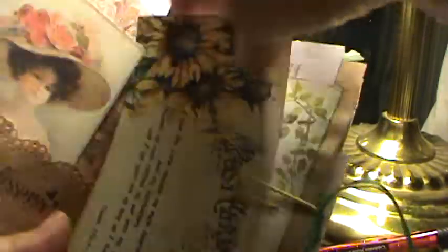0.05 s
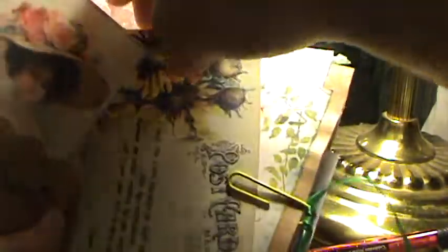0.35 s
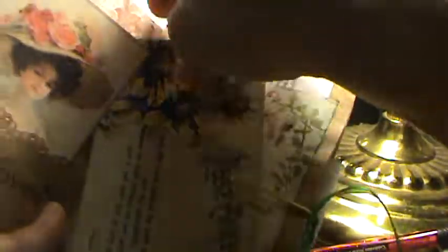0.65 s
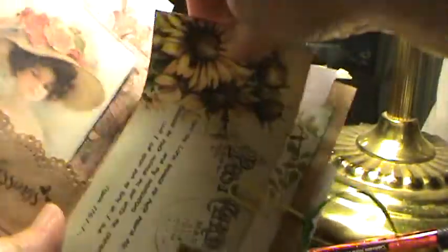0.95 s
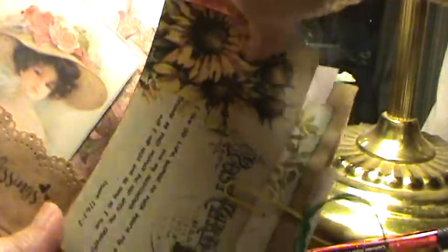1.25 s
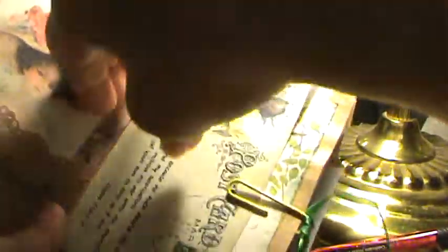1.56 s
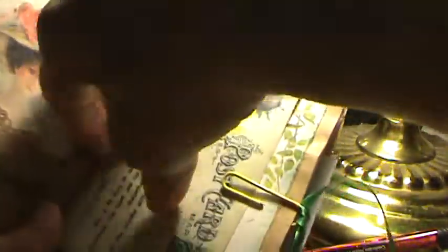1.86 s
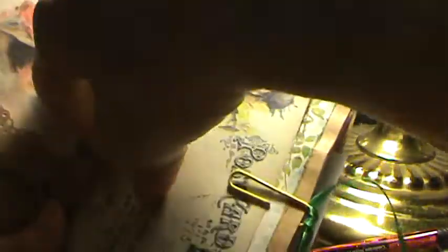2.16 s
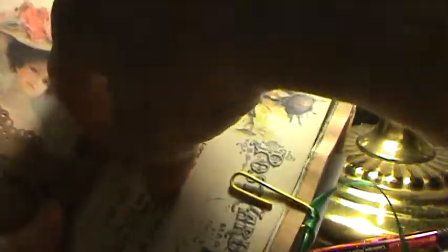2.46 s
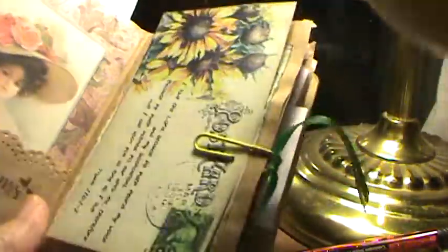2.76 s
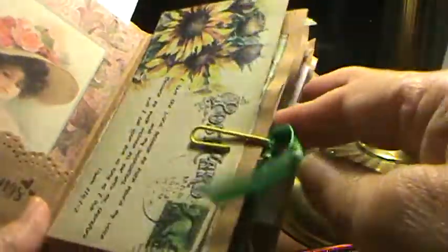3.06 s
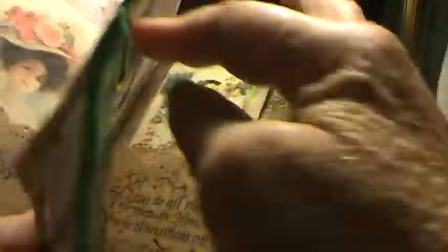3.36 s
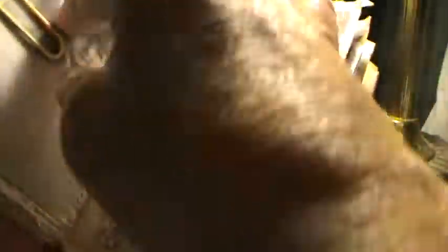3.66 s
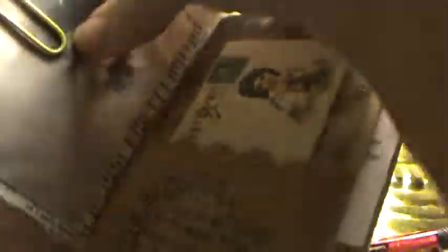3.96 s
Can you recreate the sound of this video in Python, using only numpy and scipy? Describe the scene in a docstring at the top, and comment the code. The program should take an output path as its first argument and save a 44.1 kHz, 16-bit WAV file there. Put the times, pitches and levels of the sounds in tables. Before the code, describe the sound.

Close paper rustling in a small room with a faint electrical hum. A card buckles crisply and scrapes into a journal, followed by soft pats, light finger brushes and the swish of a turning page.

```python
"""A small room with a mains hum, where a hand leafs through a handmade journal close to the microphone.
A stiff card is dragged and buckles, slides into its pocket and is patted flat; fingers brush the edges
and a page turns. Rubbing is a dense train of tiny slips that ring the paper; edges snap, and the book
thuds softly under the fingers. Far behind it all is a very faint, fast ticking."""
import sys
import numpy as np
from scipy import signal
from scipy.fft import rfft, irfft, next_fast_len
from scipy.io import wavfile
from scipy.ndimage import map_coordinates

SR = 44100
rng = np.random.default_rng(int(sys.argv[2]) if len(sys.argv) > 2 else 0)


def digitize_waveform(pressure):
    """Quantize a signal to 16-bit integers and store it at the path in sys.argv[1].

    Rows of a 2-D input are taken as channels; values are limited to [-1, 1].
    """
    field = np.atleast_2d(pressure).T
    bounded = np.clip(field, -1, 1)
    quanta = np.round(bounded * 32767).astype(np.int16)
    wavfile.write(sys.argv[1], SR, quanta)


N = 176400


def card_scrapes():
    """Stiff card scrapes over paper in short pushes that ring it; its free edge sets a broad resonance."""
    # pushes: start_s, rise_s, hold_s, fade_s (to -20 dB), level_db, tilt_db_per_octave, edge_hz
    pushes = [(0, 0.00155, 0.021, 0.1451, -39, 0.5, 2970), (.038, .0158, .0022, 0.0163, -24, 1.1, 6170),
              (.059, 0.0262, 0.043, 0.0631, -31, 0.47, 5940),
              (0.128, 0.0032, 0.01574, 0.0012, -28, 1.05, 11200),
              (0.171, 0.0088, 0.00536, 0.0513, -23, .5, 7770),
              (0.197, 0.0151, 0.0144, 0.0481, -31.5, -0.46, 2090),
              (.353, 0.00268, 0.00795, 0.0091, -36.5, -1.59, 1690),
              (0.526, 0.00504, 0.0237, 0.0734, -39, -1, 2500),
              (0.605, .02, 0.0039, 0.01, -40.5, -2.27, 1400),
              (0.653, 0.0061, 0.0365, 0.09, -46, -1.56, 2490),
              (.704, 0.0262, 0.0032, 0.1223, -32, 1.5, 2710),
              (0.777, 0.0933, 0.0151, 0.1279, -35, 1.27, 3720),
              (0.898, 0.0236, 0.0348, 0.0578, -40.5, -2.5, 1570),
              (0.981, 0.035, 0.0067, 0.0408, -39.5, 1.5, 2610),
              (1.027, 0.0405, 0.0132, 0.1437, -41, 0.03, 5510),
              (1.16, 0.0182, 0.0083, 0.0319, -41.5, -1, 2570),
              (1.212, 0.0254, 0.0209, 0.1, -39.5, 0.17, 3080),
              (1.275, 0.0359, 0.0112, 0.0055, -38.5, 1.4, 2701)]
    # tone of card on paper: freq_hz, gain_db
    tone = [(120, -14), (310, -1.5), (600, -12.5), (900, -3), (1170, -10.5), (1500, -2.5), (3400, -2.5),
            (8500, -8.5), (13000, -18.5), (16000, -22.5)]
    friction = flex(card_ring(slips(per_s=4000, spread_db=2.5, hiss=0.67, judder_db=1.55, judder_hz=300)))
    out = np.zeros(N)
    for start, rise, hold, fade, db, tilt, edge_hz in pushes:
        grain, pressure = stroke(friction, start, rise, hold, fade)
        rub = unit(colour(sheet_ring(grain, edge_hz), tone, tilt))
        add(out, start, undb(db) * pressure * rub)
    return out


def edge_snaps():
    """A paper edge lets go with a short flutter that rings the card and sings briefly at its own pitch."""
    # snaps and ticks: start_s, level_db (energy as if packed into window_s), pitch_hz, width_octaves, t60_s
    snaps = [(0.04, -29, 2980, 1.58, 0.0091), (0.0553, -24, 4270, 1.13, 0.0086),
             (0.0698, -18.5, 2150, 1.04, 0.0116), (0.1276, -15, 3984, 1.58, 0.0387),
             (.148, -24.5, 3860, 1.57, 0.014), (0.2177, -16.5, 2358, 1.39, 0.0152),
             (.2308, -22.5, 3695, 0.925, 0.0086), (.956, -30, 2007, 1.39, 0.025),
             (1.325, -36, 8000, 1.08, 0.026), (1.4798, -45, 3590, .418, 0.0113),
             (1.4882, -36.5, 3120, 0.454, 0.0118), (1.5266, -32, 7070, 1.75, 0.013),
             (1.7007, -44.5, 1375, .897, 0.0061), (1.7863, -44, 1100, 1.43, 0.0093),
             (2.7196, -56.5, 5030, 1.4, .003), (3.278, -47, 6000, 1.74, 0.0124),
             (3.44, -46.5, 8000, 0.33, 0.0041), (3.825, -33.5, 1102, 1.72, 0.0162)]
    sing_db, window_s = -8.5, .004
    t, out = np.arange(2 ** 13) / SR, np.zeros(N)
    for start, db, hz, octaves, t60 in snaps:
        flutter = rng.choice([-1, 1], len(t)) * decay(t, t60)
        crack = unit(card_ring(hump(flutter, hz, octaves)))
        snap = crack + undb(sing_db) * unit(hump(flutter, hz, octaves=0.085))
        add(out, start, undb(db) * snap / np.sqrt(np.sum(snap ** 2) / (window_s * SR)))
    return out


def book_thuds():
    """The stack of pages answers a bump with one firm, dull knock and a short shuffle."""
    # bumps and pats: start_s, peak_db, centre_hz
    bumps = [(.07, -16, 992), (.128, -22.5, 418), (.148, -27.5, 116), (.218, -26, 444), (.243, -26.5, 592),
             (.487, -35.5, 536), (.622, -35.5, 430), (.94, -34.5, 394), (1.021, -37.5, 353.9),
             (1.312, -34, 378), (1.356, -43.5, 600), (1.535, -35.5, 267.2), (1.786, -32, 245),
             (3.136, -41.5, 398), (3.816, -30, 382), (3.945, -38, 793)]
    t, out = np.arange(2 ** 14) / SR, np.zeros(N)
    knock = undb(2.5) * (t == 0)
    for start, db, hz in bumps:
        shuffle = rng.standard_normal(len(t)) * decay(t, t60_s=0.096)
        thud = card_ring(hump(shuffle / np.linalg.norm(shuffle) + knock, hz, octaves=0.788))
        add(out, start, undb(db) * thud / np.abs(thud).max())
    return out


def page_turn():
    """A thin page hisses over its neighbour; its edge sings more with speed and stops on landing."""
    # speed of the page, peaking as it lands: time_s, speed_db
    sweep = [(3.6, -63.5), (3.68, -51), (3.776, -37.5), (3.822, -32.5), (3.84, -45.5), (4, -52)]
    # tone of the thin page: freq_hz, gain_db
    tone = [(200, -9.5), (400, -3), (650, -16), (1400, -5), (8000, -1), (16000, -7.5)]
    times, db = np.array(sweep).T
    grain = light_rub()
    speed = undb(np.interp(np.arange(N) / SR, times, db, left=-np.inf))
    relative_speed = speed / speed.max()
    in_flight = np.arange(N) <= speed.argmax()
    edge = unit(flex(hump(grain, hz=4636, octaves=0.158)))
    sing = 0.902 * np.sqrt(relative_speed) * in_flight * edge
    return speed * (unit(colour(grain, tone)) + sing) / np.sqrt(1 + relative_speed)


def finger_brushes():
    """Each stroke of a finger swells and dies away, with the resonance of the sheet it touches."""
    # strokes: start_s, rise_s, fade_s (to -20 dB), level_db, tilt_db_per_octave, edge_hz
    touches = [(.28, 0.022, 0.63, -55.5, -0.04, 2400), (1.525, 0.0089, 0.26, -49.5, 0, 1870),
               (1.6, 0.052, 0.0132, -50, 0.85, 2000), (1.783, 0.0031, 0.1189, -45.5, 1, 2300),
               (1.793, 0.029, 0.0453, -41.5, -2.5, 1490), (1.92, 0.0472, 0.2086, -50.5, 1, 1590),
               (2.092, 0.0193, 0.1366, -44.5, 0.97, 4420), (2.1, 0.0625, 0.3581, -53, -2, 1007),
               (2.553, 0.0093, 0.0269, -57, -0.19, 895), (2.988, 0.0135, 0.1788, -46.5, 0.6, 4250),
               (3.062, 0.0087, 0.11, -49.5, 0.92, 2590), (3.135, 0.039, 0.1736, -51, 0.97, 2620),
               (3.255, 0.0403, 0.11, -51.5, 0.5, 4510), (3.518, 0.00565, 0.09, -46.5, 1, 2330),
               (3.85, 0.1436, 0.34, -44.5, 0.44, 5430)]
    # tone of skin on paper: freq_hz, gain_db
    tone = [(150, -14.5), (350, -2), (600, -9), (950, 1.5), (1200, -2.5), (1550, -0.5), (2600, -6),
            (5500, -6), (9000, -7.5), (16000, -20.5)]
    friction, out = light_rub(), np.zeros(N)
    for start, rise, fade, db, tilt, edge_hz in touches:
        grain, pressure = stroke(friction, start, rise, 0, fade)
        rub = unit(colour(sheet_ring(grain, edge_hz), tone, tilt))
        add(out, start, undb(db) * pressure * rub)
    return out


def slips(per_s, spread_db, hiss, judder_db, judder_hz):
    """Fibres catch and let go: tiny clicks of uneven size over a fine hiss, in irregular bunches."""
    clicks = (rng.random(N) < per_s / SR) * rng.choice([-1, 1], N)
    sizes = undb(spread_db * np.minimum(rng.exponential(size=N), 4))
    grain = unit(clicks * sizes) + hiss * rng.standard_normal(N)
    return unit(grain * undb(judder_db * drift(judder_hz)))


def light_rub():
    """The grain of a light touch on paper."""
    return slips(per_s=4000, spread_db=2.5, hiss=0.772, judder_db=1.59, judder_hz=220)


def stroke(friction, start, rise, hold, fade):
    """The stretch of friction grain under one stroke, and its pressure: build, hold, let go."""
    size = next_fast_len(int((rise + hold + 2 * fade) * SR) + 2 ** 11)
    t = np.arange(size) / SR
    grain = friction.take(int(start * SR) + np.arange(size), mode="wrap")
    pressure = np.clip(t / rise, 0, 1) * undb(-20 * np.maximum(t - rise - hold, 0) / fade)
    return grain, pressure


def card_ring(x):
    """The card rings at its resonances on top of the direct sound."""
    # resonances of the stiff card: pitch_hz, width_hz, relative_gain
    modes = [(978.2, 29, 1.89), (2307, 100, 0.55), (2603, 100, 1.67), (3960, 205, 1.39)]
    f = freqs(len(x))
    ring = sum(gain / (1 + 1j * (f * f - hz * hz) / (f * width)) for hz, width, gain in modes)
    return irfft(rfft(x) * (1 + 0.458 * ring), len(x))


def flex(x):
    """Card or page flexes as it moves, so that its resonances drift."""
    pitch_bend = .025 * drift(rate_hz=9)
    return map_coordinates(x, [np.arange(N) + np.cumsum(pitch_bend)], order=5, mode="mirror")


def sheet_ring(grain, edge_hz):
    """Slips echo across the sheet, differently at every grip; the free edge adds a broad resonance."""
    echo_db, edge_gain, edge_octaves = -5.5, 0.752, 0.219
    t = np.arange(2 ** 10) / SR
    echo = rng.standard_normal(len(t)) * decay(t, t60_s=0.00688)
    grain = grain + undb(echo_db) * signal.fftconvolve(grain, echo / np.linalg.norm(echo))[:len(grain)]
    edge = 1 + edge_gain * bell(len(grain), edge_hz, edge_octaves)
    return irfft(rfft(grain) * edge, len(grain))


def room(x):
    """Quick bright reflections from the desk and a short soft tail, different at each ear."""
    desk_db, tail_db, tail_cutoff_hz = -12, -18, 8985
    t, ears = np.arange(2 ** 14) / SR, []
    for _ in range(2):
        desk, tail = rng.standard_normal((2, len(t)))
        desk = np.diff(np.diff(desk, prepend=0), prepend=0) * decay(t, t60_s=0.0111)
        tail = tail * decay(t, t60_s=0.221) * (t > .005)
        tail = irfft(rfft(tail) / (1 + 1j * freqs(len(t)) / tail_cutoff_hz))
        echo = undb(desk_db) * desk / np.linalg.norm(desk) + undb(tail_db) * tail / np.linalg.norm(tail)
        ears.append(x + signal.fftconvolve(x, echo)[:N])
    return np.array(ears)


def mains_hum():
    """A low mains hum and its octave, wavering slightly in level."""
    # hum partials: pitch_hz, level_db
    partials = [(120.3, -54), (240.6, -72.5)]
    t = np.arange(N) / SR
    hum = sum(undb(db) * np.sqrt(2) * np.sin(2 * np.pi * hz * t) for hz, db in partials)
    return hum * undb(0.31 * drift(rate_hz=4.92))


def room_air():
    """Faint room tone; the hiss is wider than the rumble."""
    # tone of the air: freq_hz, gain_db
    tone = [(15, -62.5), (25, -14), (123, -7.5), (200, -8.5), (714, -21.5), (3400, -26), (4500, -29.5),
            (16000, -30)]
    mid, side = (unit(colour(rng.standard_normal(N), tone)) for _ in range(2))
    side = colour(side, [(100, -24), (1000, 8.0), (10000, -5)])
    return undb(-57.5) * (mid + side * np.array([[1], [-1]]))


def faint_ticking():
    """A very faint, fast ticking throughout; for a moment each tick rings on as a clean pip."""
    ticks_per_s, on_beat_s, tick_s, pip_hz = 29.95, 2.31, 0.00363, 3400
    t = np.arange(N) / SR
    age = (t - on_beat_s) % (1 / ticks_per_s)
    pulse = age / tick_s * np.exp(1 - 2 * age / tick_s)
    pips = unit(np.sqrt(pulse) * np.sin(2 * np.pi * pip_hz * age))
    pips *= (t > 2.8) * (t < 3.0) * undb(2 * drift(ticks_per_s))
    ticks = unit(pulse * hump(rng.standard_normal(N), hz=3712, octaves=0.0644))
    return undb(-72.5) * ticks + undb(-69.5) * pips


def undb(db):
    """Decibels to gain."""
    return 10 ** (np.asarray(db) / 20)


def unit(x):
    """Scale to rms 1."""
    return x / np.sqrt(np.mean(x ** 2))


def decay(t, t60_s):
    """An envelope that falls 60 dB in t60_s."""
    return np.exp(-np.log(1000) * t / t60_s)


def drift(rate_hz):
    """Smooth random motion with a spread near 1."""
    knots = rng.standard_normal(4096)
    return 1.2 * np.interp(np.arange(N) / SR * rate_hz, np.arange(len(knots)), knots)


def freqs(size):
    """Frequencies of a spectrum, kept above zero."""
    return np.maximum(np.arange(size // 2 + 1) * SR / size, 1)


def colour(x, points, tilt_db=0):
    """EQ through (freq_hz, gain_db) points, plus a tilt per octave."""
    hz, db = np.array(points).T
    octave = np.log2(freqs(len(x)))
    curve_db = np.interp(octave, np.log2(hz), db) + tilt_db * np.maximum(octave - np.log2(hz[0]), 0)
    return irfft(rfft(x) * undb(curve_db), len(x))


def bell(size, hz, octaves):
    """A bell curve on a log-frequency axis."""
    return np.exp(-.5 * (np.log2(freqs(size) / hz) / octaves) ** 2)


def hump(x, hz, octaves):
    """A bell-shaped band filter, minimum phase so that it rings only after the hit."""
    cepstrum = irfft(np.log(bell(len(x), hz, octaves) + undb(-32.5)), len(x))
    cepstrum[1:len(x) // 2] *= 2
    cepstrum[len(x) // 2 + 1:] = 0
    return irfft(rfft(x) * np.exp(rfft(cepstrum)), len(x))


def add(out, start_s, x):
    """Mix a short sound in at its time."""
    i = max(int(start_s * SR), 0)
    out[i:i + len(x)] += x[:max(N - i, 0)]


def scene():
    """Paper sounds just left of centre in the room, over hum, air and ticking."""
    paper = card_scrapes() + page_turn() + finger_brushes() + edge_snaps() + book_thuds()
    pan = undb([[.25], [-.25]])
    return room(paper) * pan + mains_hum() + room_air() + faint_ticking()


def record(dry):
    """The microphone softens the highest treble and the recorder cuts the top."""
    top_hz = 15800
    soft = np.array([colour(x, [(12000, 0), (16000, -2)]) for x in dry])
    return signal.sosfilt(signal.ellip(10, .2, 70, top_hz, fs=SR, output="sos"), soft)


dry = scene()
out = record(dry)
digitize_waveform(out)
```